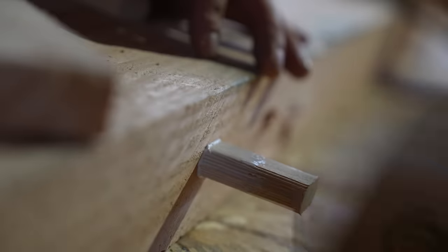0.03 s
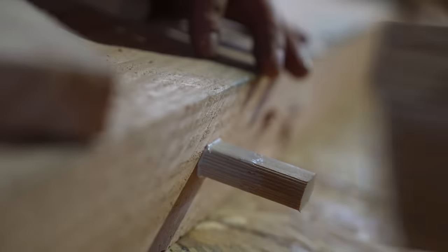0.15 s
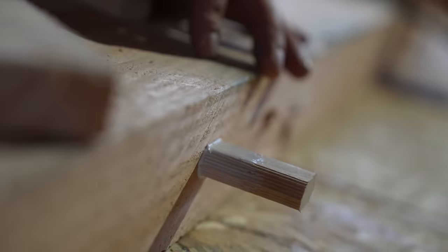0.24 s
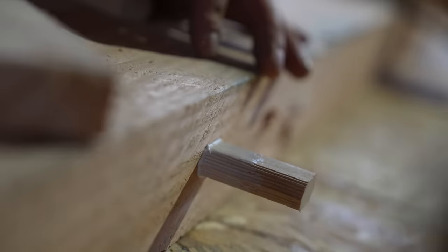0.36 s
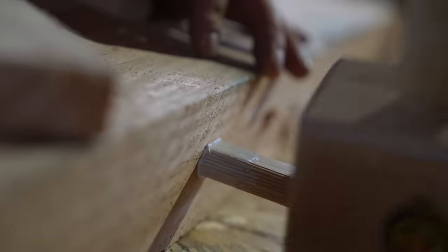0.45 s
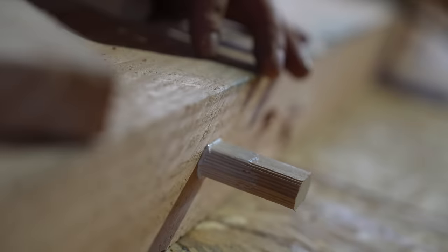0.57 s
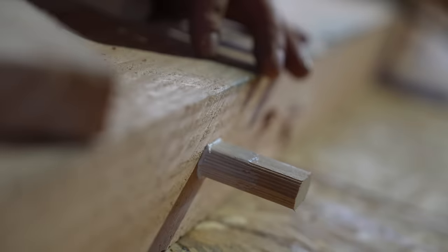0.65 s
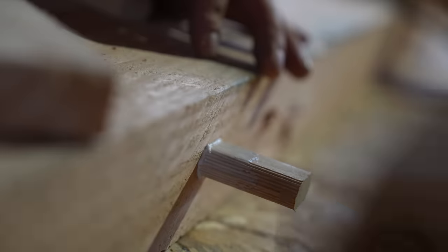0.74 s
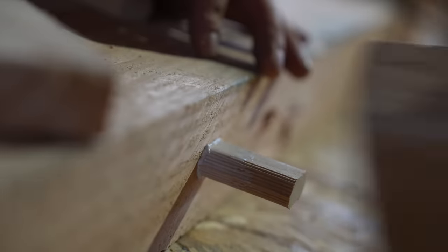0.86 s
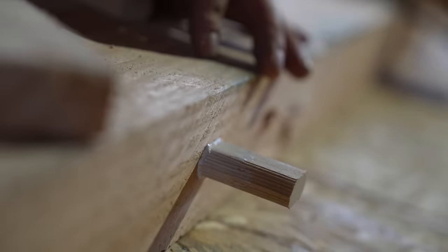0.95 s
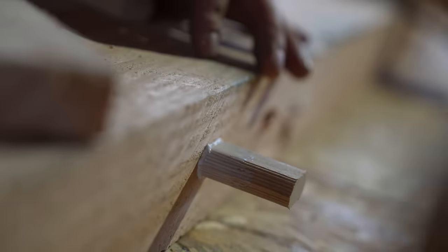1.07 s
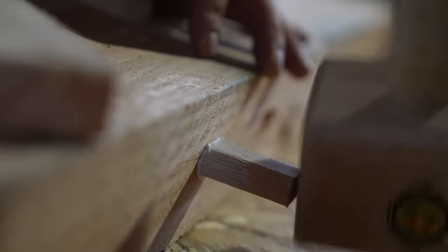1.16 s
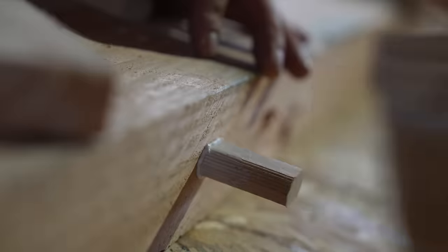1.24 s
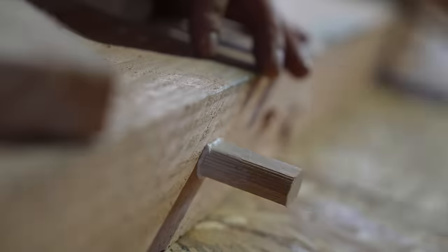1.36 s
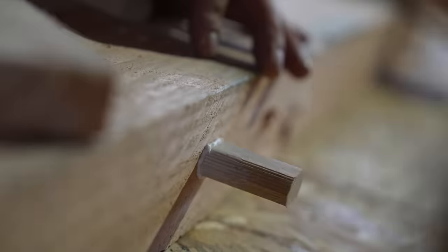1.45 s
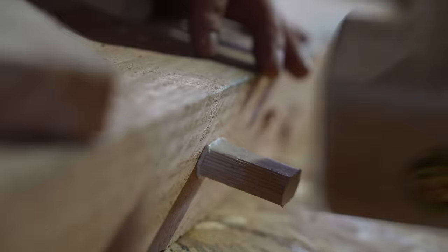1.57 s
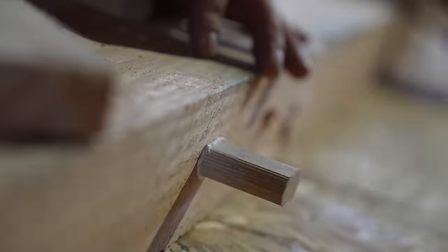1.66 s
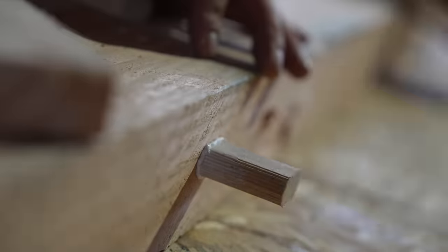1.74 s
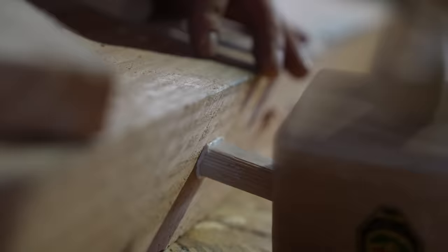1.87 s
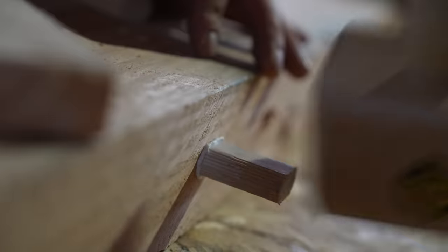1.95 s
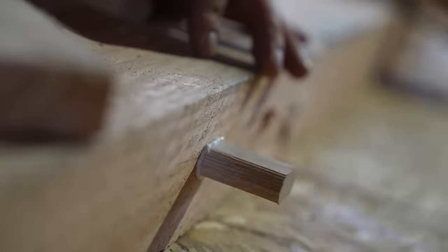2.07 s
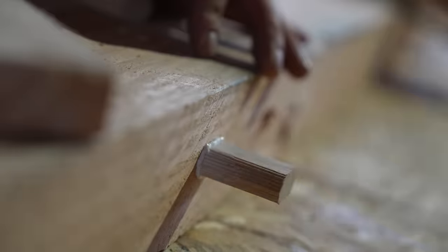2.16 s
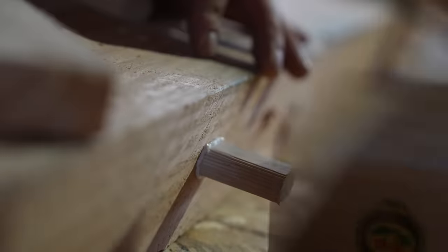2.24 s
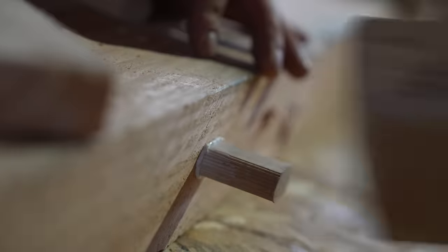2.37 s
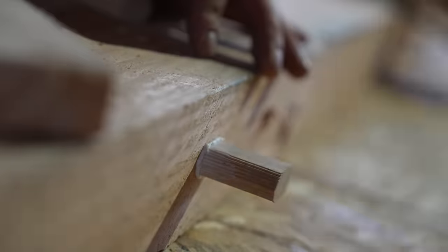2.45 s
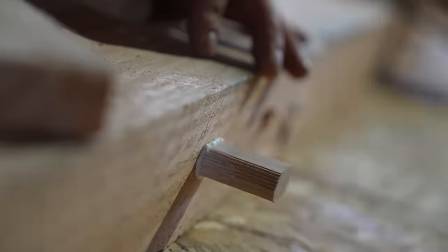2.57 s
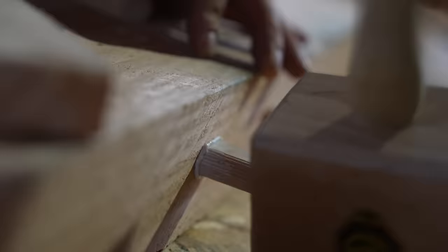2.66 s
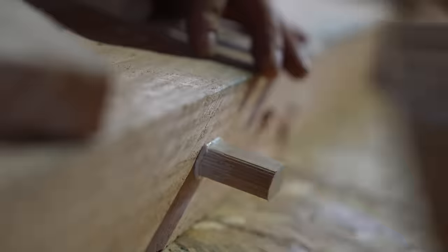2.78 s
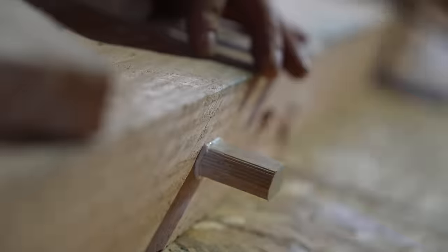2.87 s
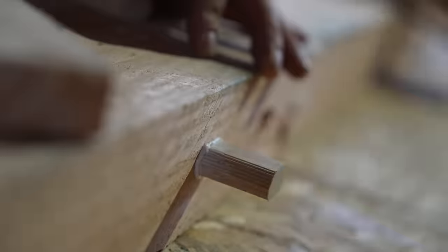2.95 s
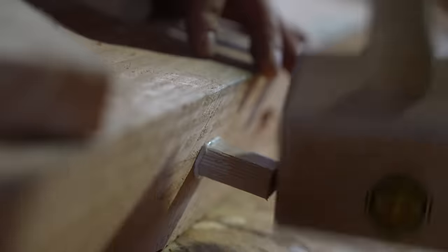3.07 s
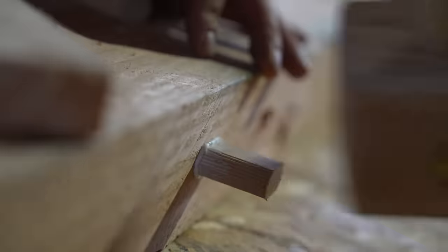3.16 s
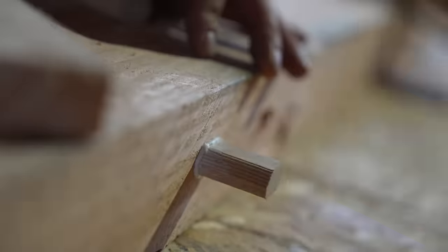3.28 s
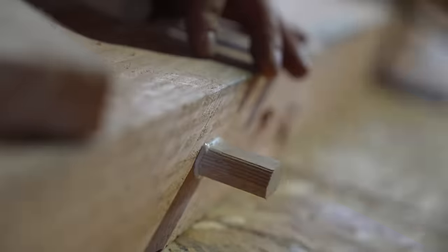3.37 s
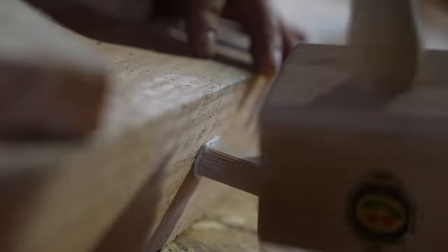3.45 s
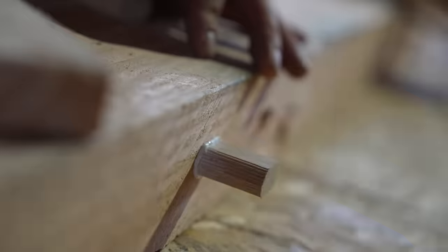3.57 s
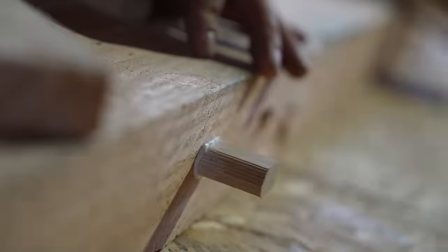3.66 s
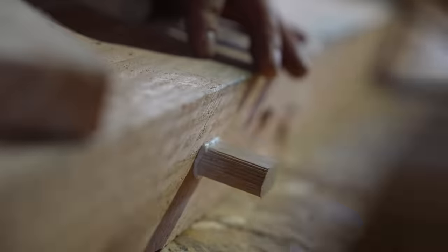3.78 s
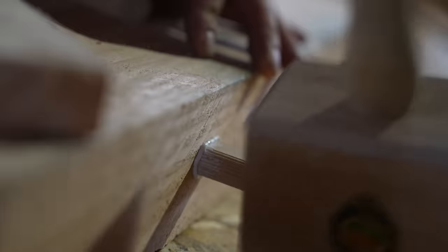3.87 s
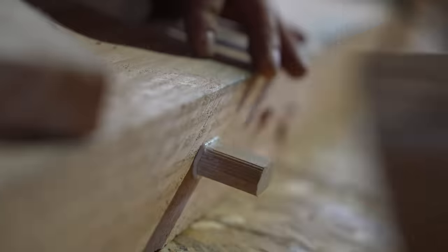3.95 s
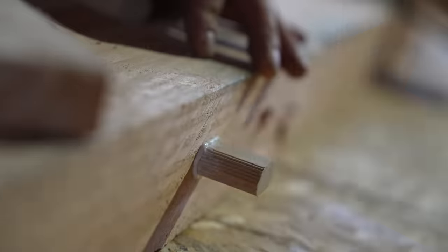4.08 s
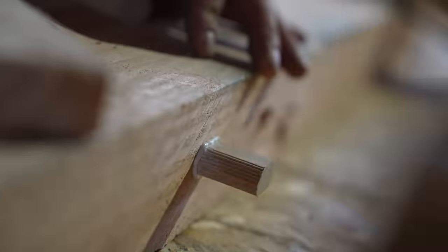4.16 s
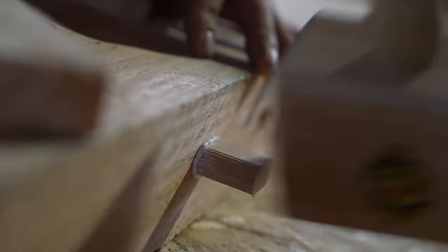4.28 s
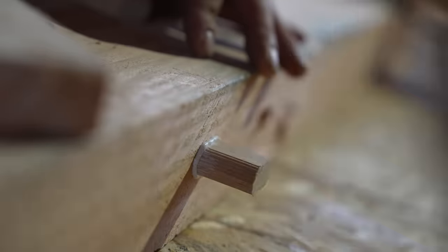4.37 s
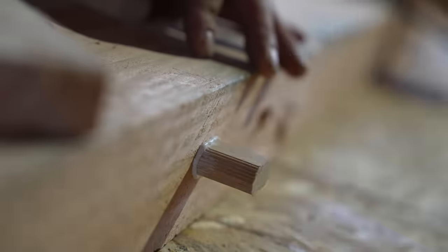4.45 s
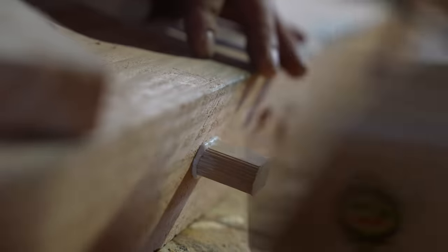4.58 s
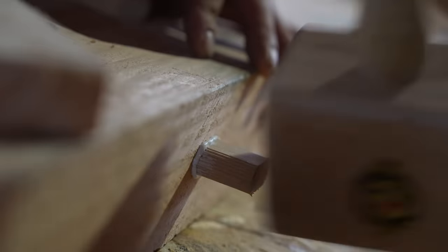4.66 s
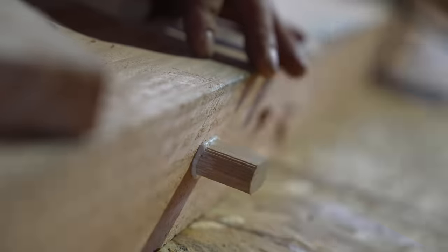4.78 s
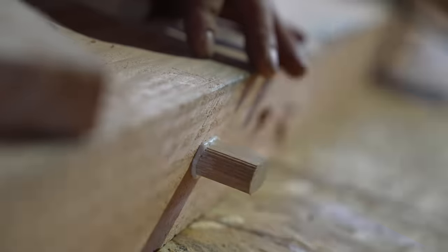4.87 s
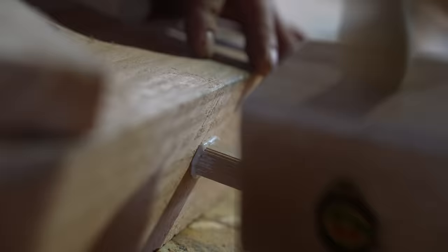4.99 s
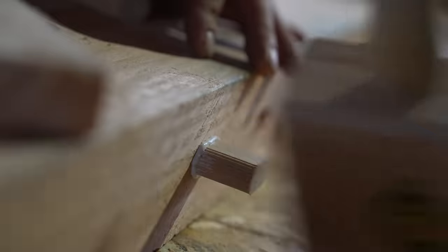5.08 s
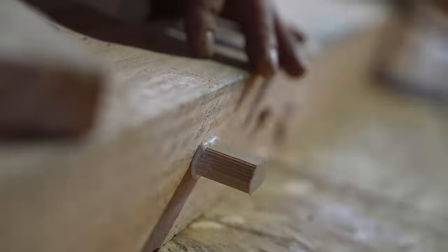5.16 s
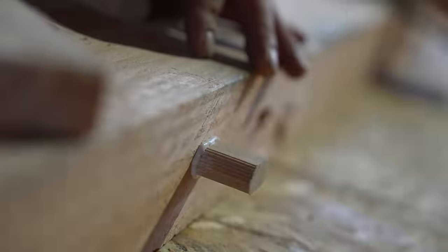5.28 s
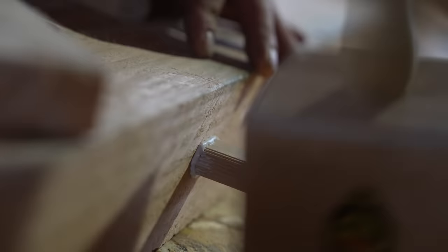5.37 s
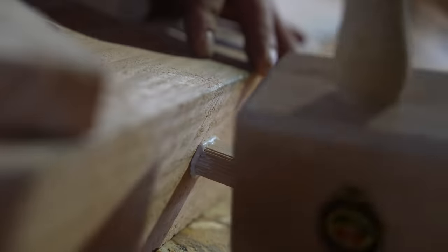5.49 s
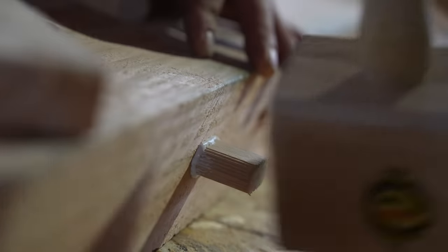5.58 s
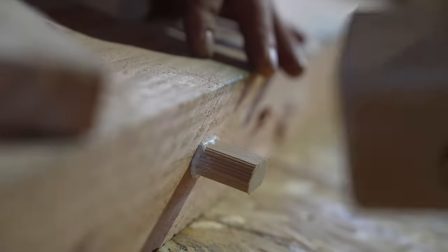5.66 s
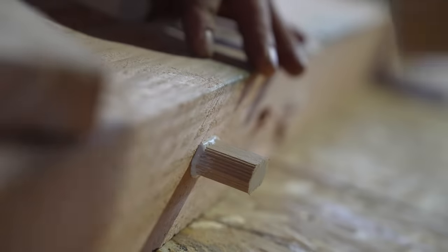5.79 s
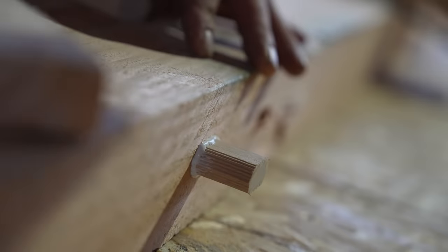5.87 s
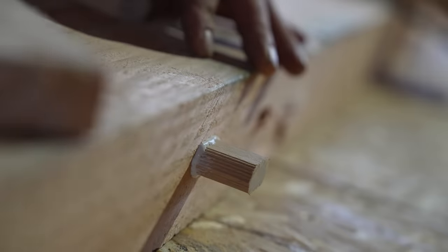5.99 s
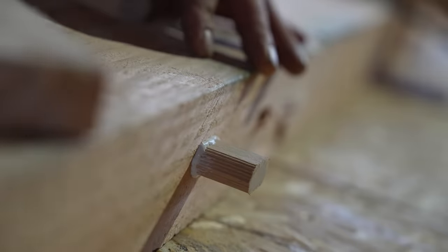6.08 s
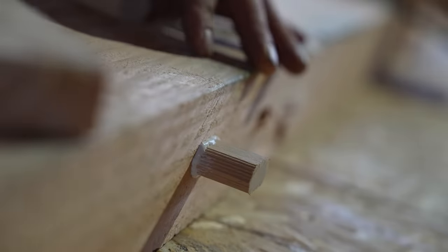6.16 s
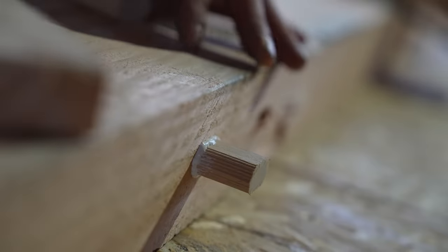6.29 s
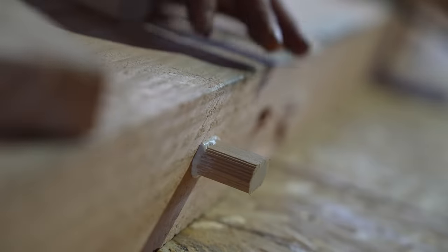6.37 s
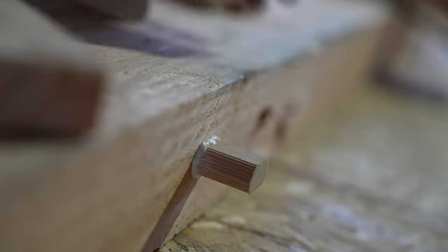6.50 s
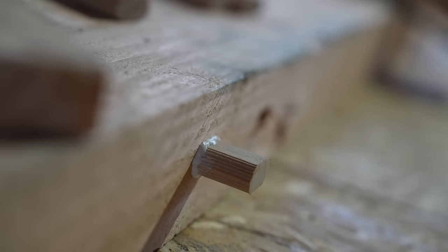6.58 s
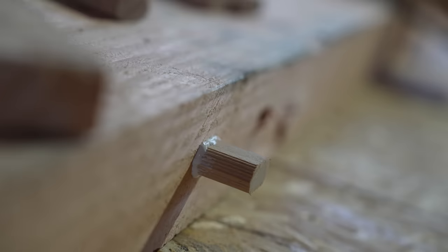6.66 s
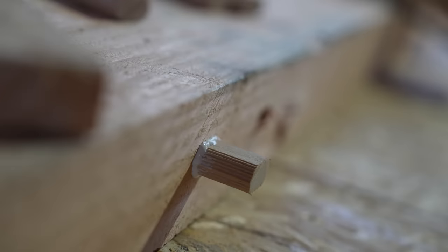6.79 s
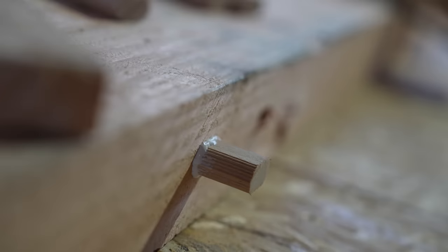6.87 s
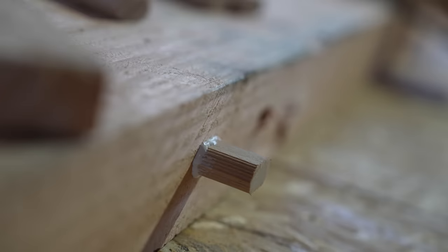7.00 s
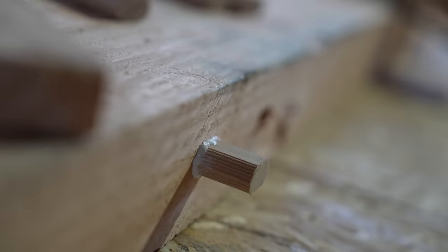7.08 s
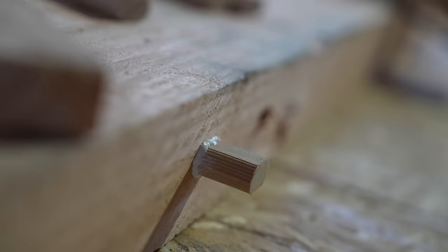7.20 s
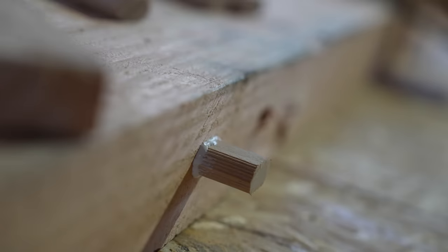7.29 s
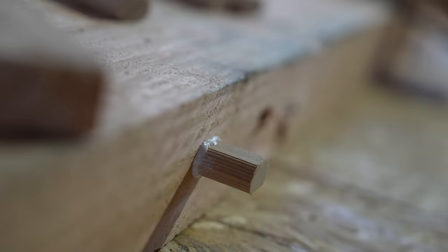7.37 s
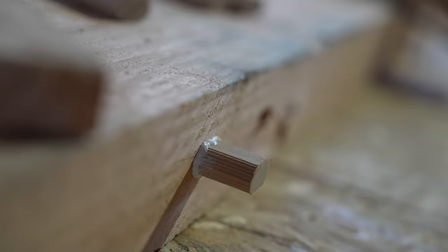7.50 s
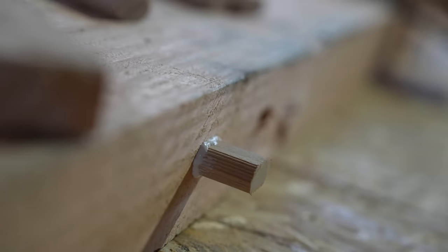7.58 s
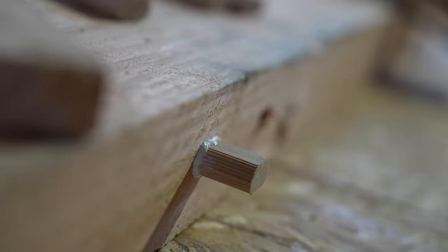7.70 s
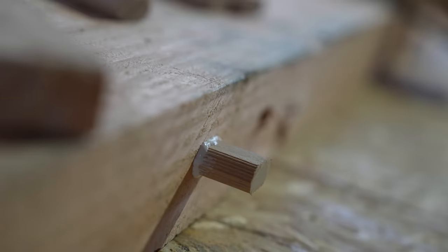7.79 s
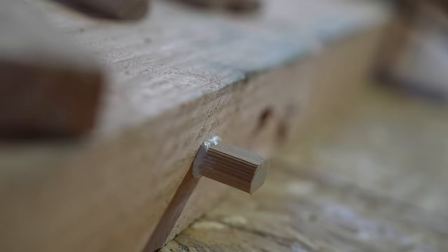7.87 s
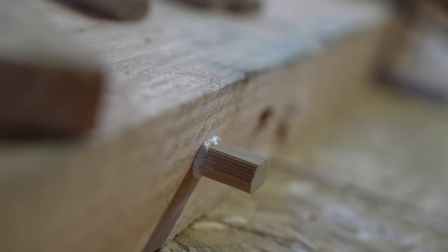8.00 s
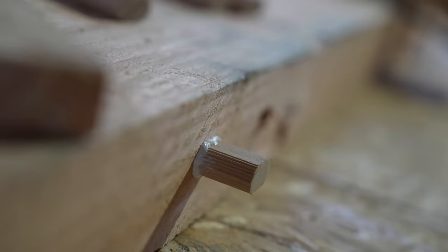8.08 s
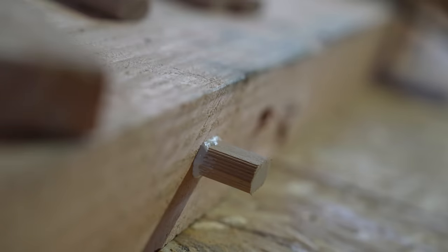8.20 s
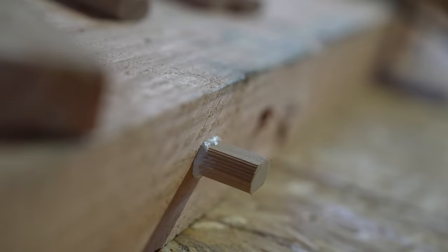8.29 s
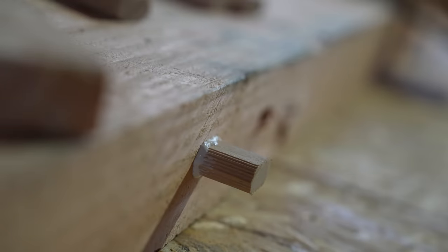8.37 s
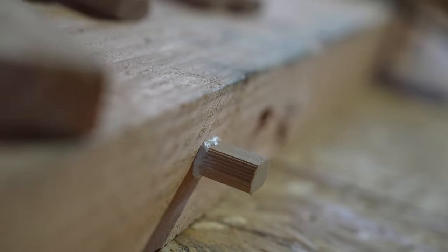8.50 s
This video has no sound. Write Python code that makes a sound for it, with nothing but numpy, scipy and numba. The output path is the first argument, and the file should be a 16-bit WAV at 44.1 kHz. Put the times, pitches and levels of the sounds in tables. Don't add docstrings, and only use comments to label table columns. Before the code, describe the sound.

A wooden mallet hammers a dowel into a timber beam about every 0.4 seconds, loud cracking knocks in an echoing workshop, then quiet bench scuffs.

```python
import sys
import numpy as np
from scipy import signal
from scipy.fft import rfft, irfft, next_fast_len
from scipy.io import wavfile
from numba import njit

SR = 44100
rng = np.random.default_rng(int(sys.argv[2]) if len(sys.argv) > 2 else 0)


def field_ratio(decibels):
    return 10 ** (np.asarray(decibels, dtype=float) / 20)


def persist_wave(psi):
    counts = np.round(np.clip(psi, -1, 1) * 32767).astype(np.int16)
    wavfile.write(sys.argv[1], SR, np.atleast_2d(counts).T)


N = 376613
LEAD = SR // 2
RIGHT_DB = -11

# start_s, force_db, softness_db
BLOWS = [(-.2207, -5.5, 5.6), (0.1337, -6.5, 7.5), (.491, -8.5, -2.7), (0.8451, -7.5, 1.1),
         (1.1984, -6, 6.5), (1.5791, -5.5, 4.07), (1.9516, -6, 1.4), (2.338, -5, 2), (2.726, -3, -0.3),
         (3.1089, 1.5, 8), (3.5015, -2.5, -4), (3.8945, -1.1, 0), (4.2764, -4, 2.34), (4.6749, -2, -1.94),
         (5.069, -4, 2), (5.4489, 5, 4)]
# time_s, seating_db
SEATING = [
    (3.2, -5),
    (4.3, -2),
    (5.1, 5.5),
    (5.5, 2),
]
# pitch_hz, level_db, t60_s
HEAD = [(505, -30.5, 0.066), (918, -19, 0.061), (1130, -21, 0.004), (1604, 5.5, 0.016), (2084, 10, 0.0063),
        (2510, 8, 0.0066), (2904, 9, 0.0062), (3500, -0.5, 0.012), (4013, 1.5, 0.015), (4952, -1, 0.014),
        (5600, -12, 0.0019)]
# pitch_hz, level_db, t60_s
BEAM = [(244, -12, .2), (331, -11, .25), (497, -8, .3), (645, -15, .2), (842, -13, .3), (1033, -16, .3),
        (1188, -14, .33), (1209, -14, .33), (1384, -14, .4), (1465, -14, .33), (1543, -11, .4),
        (1568, -11, .3), (1652, -14, .33)]
# pitch_hz, level_db, t60_s
SEATED_RING = [(500.2, -21, .15), (853.6, -17.5, 0.37), (1200, -23, 0.05), (1473, -21, 0.39)]
# pitch_hz, level_db, t60_s, build_up_s
ROOM_MODES = [(65, -33, 0.5, 0.16), (126.5, -19.5, 0.21, 0.03), (155, -21.5, 0.33, 0.038),
              (190, -19, 0.17, 0.04), (225.6, -17, 0.11, 0.045)]
# pitch_hz, level_db, t60_s, build_up_s
ROOM = [(60, -4, 1, .03), (120, 8, 0.53, 0.03), (370, 1.5, 0.46, 0.014), (1540, -1, 0.42, 0.004),
        (3780, 1.5, 0.35, 0.021), (5560, -9.5, 0.36, 0.015), (12000, -12.5, .28, .012),
        (16000, -28, 0.22, .012)]
# delay_s, level_db
ECHOES = [(.017, -26), (.0235, -26), (.028, -24), (.036, -27)]
# pitch_hz, level_db (per Hz)
HUM = [(25, -3), (190, -6), (260, -12.5), (330, -4.5), (489, -13), (1400, -16), (12200, -31),
       (16000, -36.5)]
# pitch_hz, width_hz, level_db
HUM_LINE = [(322, 14, -77)]
# start_s, level_db, centre_hz, length_s
BUMPS = [
    (1.058, -34, 1900, .005),
    (1.059, -29, 90, .02),
    (1.06, -32, 190, .01),
    (7.094, -54, 1600, .016),
    (7.096, -59, 3600, .016),
    (7.108, -63, 8500, .025),
    (7.117, -57, 1500, .018),
    (7.119, -59, 3600, .018),
]
# start_s, level_db, low_pitch_hz, high_pitch_hz
GLANCE = [
    (3.098, -11, 170, 810),
]
# start_s, length_s, pitch_hz, width_hz, level_db
SQUEAK = [
    (5.86, .22, 3950, 330, -66.5),
]
# start_s, level_db, centre_hz, length_s
SCUFFS = [(5.93, -61, 2000, .012), (6.235, -63, 2400, .02), (6.451, -58, 3200, .006),
          (6.515, -60.5, 2800, .008)]
# start_s, level_db, centre_hz, length_s
KNOCKS = [(6.466, -41.5, 316, 0.018), (6.47, -50.5, 110, .05), (6.606, -55, 367, .042),
          (6.77, -56, 1200, .02), (7.492, -62, 900, .012), (7.515, -59.5, 720, 0.048),
          (7.8, -69.5, 246.4, .082), (8.167, -59.5, 260, 0.035), (8.17, -58.5, 1000, 0.058)]
# start_s, hold_s, level_db
DRAGS = [
    (6.47, .14, -50.5),
    (6.714, .06, -65),
    (6.903, 0.093, -56),
]
# start_s, peak_db
SET_DOWN = [
    (6.795, -10.5),
]
# pitch_hz, level_db, t60_s
BENCH = [(110, -5.5, 0.087), (329, -17, 0.16), (435, -8, 0.092), (560, -23, .05), (670, -18, 0.11),
         (670, -4, 0.048), (810, 5.5, 0.029), (1000, 10, 0.015), (1210, 3.5, 0.025), (1570, 5.5, 0.015),
         (2000, 9, 0.01), (2400, -8, 0.011)]


def band(x, hz, width):
    return signal.lfilter(*signal.iirpeak(hz, hz / min(width, SR / 3), fs=SR), x)


def unit(x):
    return x / np.sqrt(np.mean(x ** 2))


def fade(t, t60):
    return np.exp(-np.log(1000) * t / t60)


def add(track, x, s):
    i = LEAD + int(s * SR)
    track[i:i + len(x)] += x[:len(track) - i]


def contact(ms):
    t = np.arange(132) / SR * 1000
    force = t * np.exp(-t / ms)
    return force / force.sum()


def ring(push, modes, spread_db, detune, depth=0):
    t = np.arange(int(SR * max(t60 for *_, t60 in modes)) + 200) / SR
    out = np.zeros(len(t))
    for hz, db, t60 in modes:
        a, b, c, d = rng.standard_normal(4)
        tone = np.sin(2 * np.pi * hz * (1 + detune * b) * t)
        beat_hz = 14 * field_ratio(4.3 * c)
        throb = 1 + depth * np.sin(2 * np.pi * beat_hz * t + d)
        out += field_ratio(db + spread_db * a) * tone * fade(t, t60) * throb
    return np.convolve(out, push)[:len(t)]


def thump():
    t = np.arange(SR // 2) / SR
    out = np.zeros(len(t))
    for hz, db, t60, rise in ROOM_MODES:
        a, b = rng.standard_normal(2)
        tone = np.sin(2 * np.pi * hz * (1 + b / 100) * t)
        out += field_ratio(db + 2 * a) * tone * (1 - np.exp(-(t / rise) ** 2)) * fade(t, t60)
    return out


def mallet_blows(wide, close, low):
    flight_s, beat_depth = 0.0007, 0.6
    t = np.arange(600) / SR
    for s, force_db, soft_db in BLOWS:
        s += flight_s
        seated_db = np.interp(s, *np.transpose(SEATING))
        push = contact(np.clip(0.024 * field_ratio(soft_db + seated_db), 0.01, 0.4))
        click_db = force_db + 0.78 * seated_db + 22
        add(wide, -field_ratio(click_db) * np.diff(push, prepend=0), s)
        beam_db = force_db - 12 + 0.19 * soft_db + 1.3 * seated_db
        add(close, -field_ratio(beam_db) * ring(push, BEAM, spread_db=2.5, detune=0.0023, depth=beat_depth), s)
        add(close, -field_ratio(force_db + seated_db / 2) * ring(push, HEAD, spread_db=1.5, detune=0.012), s)
        grip = ring(push, SEATED_RING, spread_db=2.5, detune=0.003, depth=beat_depth)
        add(close, -field_ratio(force_db + 1.9 * seated_db) * grip, s)
        crackle_db = force_db + 14 - 0.33 * max(soft_db + seated_db, 0)
        crackle = band(band(rng.standard_normal(len(t)), 3100, 4300), 4500, 10000)
        add(low, field_ratio(crackle_db) * crackle * np.exp(-t / 0.0011), s)
        add(low, field_ratio(9.5 + 0.45 * force_db) * thump(), s)


def workshop():
    room_db, gap_s = 3.5, 0.0054
    nearby_db, nearby_s, nearby_hz = -1.5, 0.012, 4300
    t = np.arange(int(0.9 * SR)) / SR
    late = np.clip(t - gap_s, 0, 1)
    out = np.zeros(len(t))
    hz, *columns = np.transpose(ROOM)
    grain = rfft(rng.standard_normal(len(t)) * field_ratio(2.47 * rng.standard_normal(len(t))))
    octave = np.log2(np.arange(len(grain)) * SR / len(t) + 1)
    for f in 40 * 2 ** np.arange(0, 9.5, 0.5):
        db, t60, rise = (np.interp(np.log(f), np.log(hz), c) for c in columns)
        early = field_ratio(nearby_db) * np.exp(-t / nearby_s) / (1 + (f / nearby_hz) ** 4)
        swell = 1 - np.exp(-(late / rise) ** 2)
        share = np.cos(np.pi * np.clip(octave - np.log2(f), -0.5, 0.5)) ** 2
        out += field_ratio(db) * (early + swell) * fade(t, t60) * irfft(grain * share, len(t))
    out *= field_ratio(room_db - 25.5)
    for s, db in ECHOES:
        out[int(s * SR)] += field_ratio(db)
    return out


def hum():
    size = next_fast_len(N, True)
    f = np.arange(size // 2 + 1) * SR / size + 1
    hum_hz, hum_db = np.transpose(HUM)
    colour = field_ratio(np.interp(np.log(f), np.log(hum_hz), hum_db))
    tone = irfft(rfft(rng.standard_normal(size)) * colour, size)[:N]
    hz, width, db = HUM_LINE[0]
    line = band(band(rng.standard_normal(N), hz, width), hz, width)
    return field_ratio(-68.5) * unit(tone) + field_ratio(db) * unit(line)


def bursts(near, far, table, wide, room_db):
    t = np.arange(SR // 4) / SR
    for s, db, hz, length in table:
        noise = band(band(rng.standard_normal(len(t)), hz, wide * hz), hz, 2 * wide * hz)
        burst = unit(noise) * t / length * np.exp(1 - 3 * t / length) * 3
        add(near, field_ratio(db) * burst, s)
        add(far, field_ratio(db + room_db) * burst, s)


def glancing_blow(close, low):
    t = np.arange(600) / SR
    for s, db, *tones in GLANCE:
        modes = [(hz, 0, 0.04) for hz in tones]
        add(low, -field_ratio(db) * ring(contact(0.15), modes, spread_db=0, detune=0), s)
        scrape = band(rng.standard_normal(len(t)), 1800, 3000) * np.exp(-t / 0.011)
        add(close, field_ratio(db - 20.5) * scrape, s)


def hand_squeak():
    t = (np.arange(N + LEAD) - LEAD) / SR
    start, length, hz, width, db = SQUEAK[0]
    swell = np.sin(np.pi * np.clip((t - start) / length, 0, 1)) ** 0.5
    return field_ratio(db) * unit(band(rng.standard_normal(len(t)), hz, width)) * swell


def bench_drags():
    attack_s, fall_db_s = 0.013, 110
    t = (np.arange(N + LEAD) - LEAD) / SR
    rumble = unit(band(band(rng.standard_normal(len(t)), 90, 130), 90, 200))
    level = np.zeros(len(t))
    for s, hold, db in DRAGS:
        onset = np.clip((t - s) / attack_s, 0, 1)
        level += onset * field_ratio(db - fall_db_s * np.clip(t - s - hold, 0, 2))
    return rumble * level


def set_down(wide, close, low):
    settle_s, rattle_s = 0.002, 0.002
    t = np.arange(600) / SR
    for s, db in SET_DOWN:
        rattle = rng.standard_normal(len(t)) * t / rattle_s * np.exp(-t / rattle_s) / 6
        soft = np.convolve(contact(0.049), rattle)
        bench = ring(contact(0.099), BENCH, spread_db=5, detune=0)
        settle = 1 - np.exp(-np.arange(len(bench)) / SR / settle_s)
        add(close, field_ratio(db + 4) * bench * settle, s)
        add(low, field_ratio(db + 6.5) * np.diff(soft, prepend=0), s)
        add(wide, field_ratio(db + 16) * np.diff(contact(0.16), prepend=0), s)
        add(low, field_ratio(db - 5) * thump(), s)


def scene():
    wide, close, low, near, far = np.zeros((5, N + LEAD))
    mallet_blows(wide, close, low)
    bursts(near, far, BUMPS, wide=0.9, room_db=-28)
    glancing_blow(close, low)
    near += hand_squeak()
    bursts(near, far, SCUFFS, wide=1.1, room_db=-5)
    bursts(near, far, KNOCKS, wide=0.72, room_db=-9.5)
    near += bench_drags()
    set_down(wide, close, low)
    bass_cut = signal.butter(2, 200, "high", fs=SR, output="sos")
    wide, close = signal.sosfilt(bass_cut, [wide, close])
    sends = [wide + far, field_ratio(-13) * close]
    echo = signal.oaconvolve(sends, [workshop(), workshop()], axes=1).sum(axis=0)
    heard = wide + close + low + near + echo[:N + LEAD]
    return (heard[LEAD:] + hum()) * np.array([[1], [field_ratio(RIGHT_DB)]])


@njit
def limiter(x, top, power, attack, release):
    y, e = np.empty(len(x)), 0.
    for i in range(len(x)):
        e += (abs(x[i]) - e) * (attack if abs(x[i]) > e else release)
        y[i] = x[i] * (top / max(e, top)) ** power
    return y


def roll_off(x):
    return signal.sosfilt(signal.butter(12, 17080, fs=SR, output="sos"), x)


def record(dry):
    limit_db, ratio, attack_s, release_s = -5.5, 3, 0.0017, 0.33
    hiss_db, ceiling = -76, 0.7
    mic = signal.lfilter(*signal.butter(2, 10600, fs=SR), dry[0])
    left = limiter(mic, field_ratio(limit_db), 1 - 1 / ratio, 1 / (attack_s * SR), 1 / (release_s * SR))
    x = left * np.array([[1], [field_ratio(RIGHT_DB)]])
    x = x + field_ratio(hiss_db) * rng.standard_normal(dry.shape)
    x = np.clip(x, -ceiling, ceiling)
    x = signal.sosfilt(signal.butter(8, 15200, fs=SR, output="sos"), x)
    return roll_off(x)


dry = scene()
out = record(dry)
persist_wave(out)
```